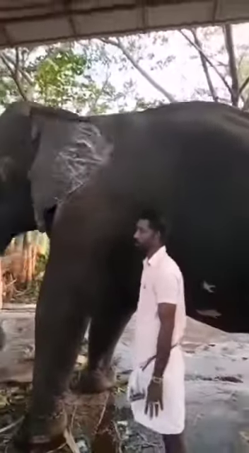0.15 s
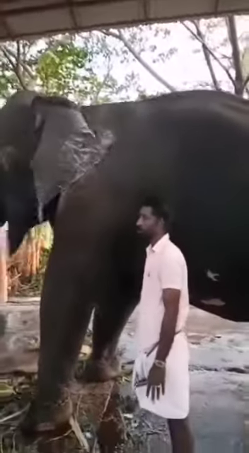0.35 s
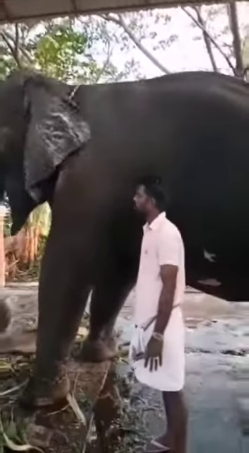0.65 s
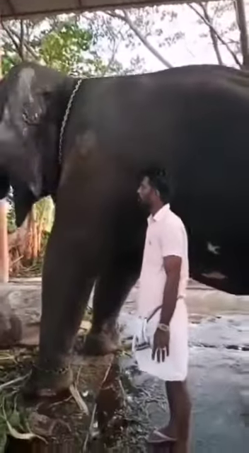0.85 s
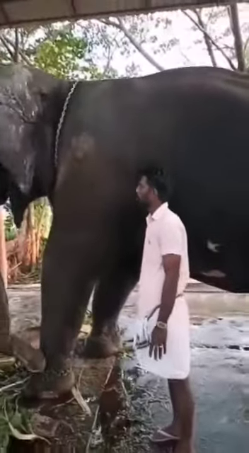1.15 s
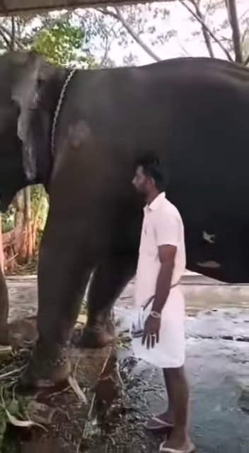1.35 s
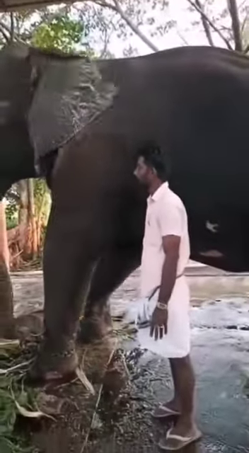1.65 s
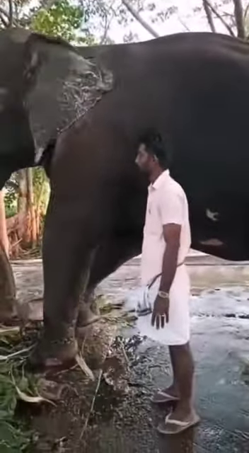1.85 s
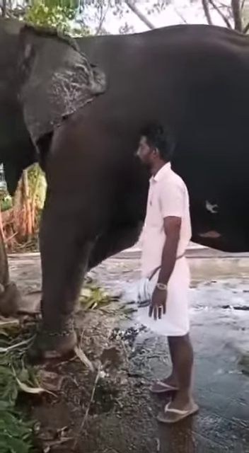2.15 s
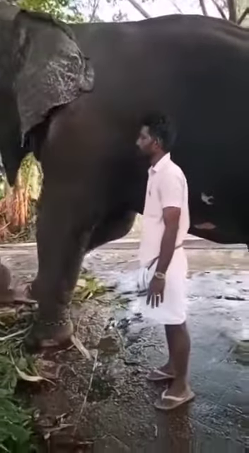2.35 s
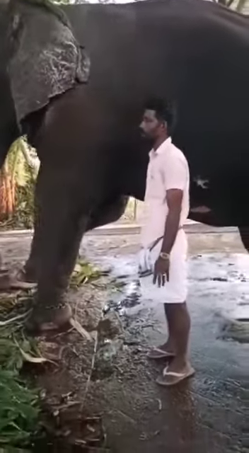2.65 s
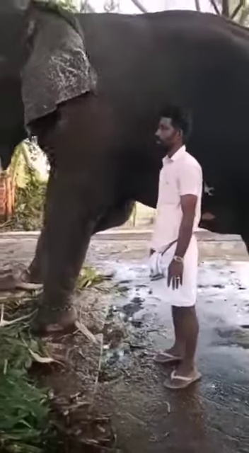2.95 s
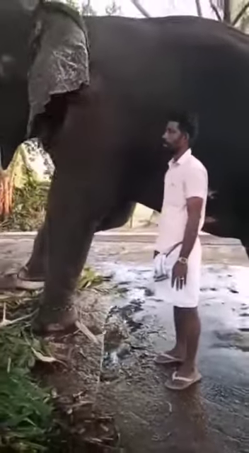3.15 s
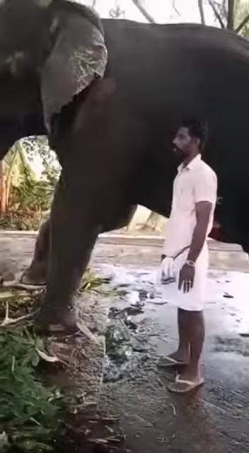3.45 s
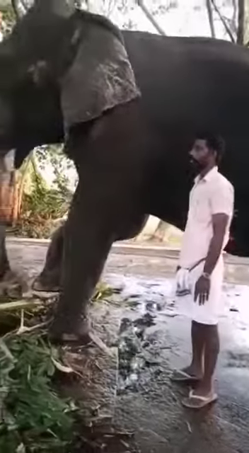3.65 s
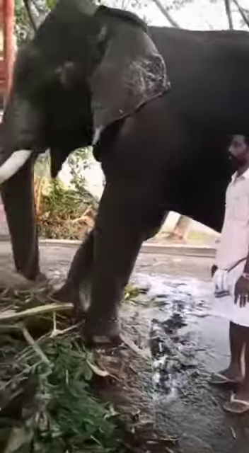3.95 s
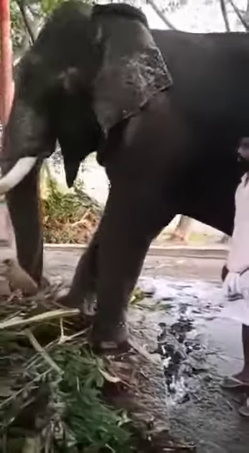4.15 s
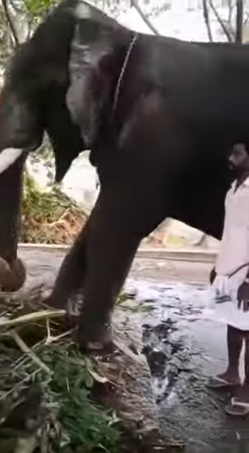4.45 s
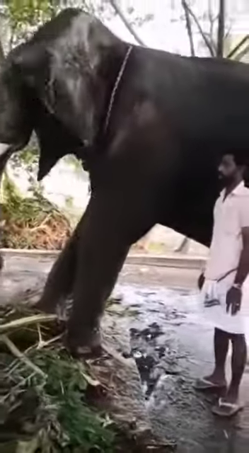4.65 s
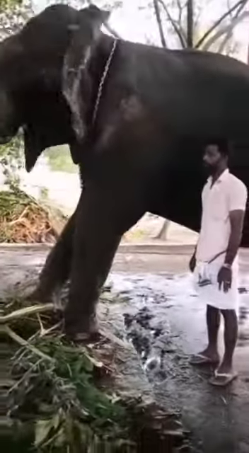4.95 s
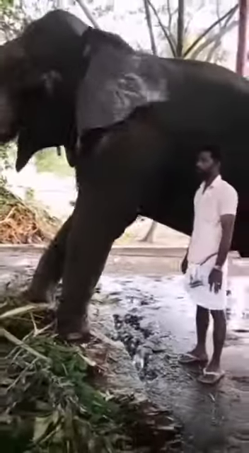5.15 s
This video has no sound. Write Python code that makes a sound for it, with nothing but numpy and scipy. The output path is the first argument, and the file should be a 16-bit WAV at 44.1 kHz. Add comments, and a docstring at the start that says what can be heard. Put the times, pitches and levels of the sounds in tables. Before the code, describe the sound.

Close, crisp leaf crackle over a very quiet outdoor hush: scattered dry snaps and soft low ear flaps, a slowly growing rustle, then a sudden crunching burst as a heavy foot presses the fronds. A quieter passage with tiny squeaks follows. Finally a stalk rips in a ragged run of woody cracks, and the leafy heap is heaved in several noisy pulls, with a short tail from roof and wet floor.

```python
"""Leaflets crackle and snap, a stalk squeaks and splits, big ears slap: an elephant feeds on palm fronds.
It steps in the heap, drags it and tears a thick stalk under an open shelter.
Fronds are shaped noise, fracture clicks and ringing ribs, driven by gains of its movements.
Snaps and splits are decaying resonant bursts, squeaks gliding sines, soft contacts and thuds low swings.
Roof and wet floor add a short diffuse tail, over a faint outdoor hush of shaped noise."""
import sys
import numpy as np
from scipy import signal
from scipy.fft import rfft, irfft, next_fast_len
from scipy.io import wavfile
from scipy.ndimage import map_coordinates

SR = 44100
rng = np.random.default_rng(int(sys.argv[2]) if len(sys.argv) > 2 else 0)


def materialize(psi):
    """Save the field psi as 16-bit PCM at rate SR to the path in sys.argv[1].

    A 1-D psi becomes a single channel; in a 2-D psi each row is a channel.
    """
    bounded = np.clip(np.atleast_2d(psi).T, -1, 1)
    quanta = np.round(bounded * 32767).astype(np.int16)
    wavfile.write(sys.argv[1], SR, quanta)


N = 234279


def amp(db):
    """Decibels to gain."""
    return 10 ** (np.asarray(db) / 20)


def unit(x):
    """x at rms 1."""
    return x / np.sqrt(np.mean(x ** 2) + 1e-20)


def along(points, hz):
    """(Hz, value) points interpolated on a log frequency axis."""
    f, v = np.transpose(points)
    return np.interp(np.log(hz + 1), np.log(f + 1), v)


def wobble(knots_per_s, size=N):
    """Smooth random curve through normally distributed knots."""
    knots = rng.standard_normal(int(size * knots_per_s / SR) + 4)
    return map_coordinates(knots, [np.arange(size) * knots_per_s / SR])


def filtered(x, response):
    """x times a response of frequency in Hz."""
    size = x.shape[-1]
    m = next_fast_len(size + SR // 10)
    return irfft(rfft(x, m) * response(np.fft.rfftfreq(m, 1 / SR)), m)[..., :size]


def resonance(f, hz, width_hz):
    """Causal response of one damped mode, gain 1 at its pitch."""
    return 1j * f * width_hz / (hz * hz - f * f + 1j * f * width_hz)


def spread(pair, side_db):
    """Two unrelated signals as the middle and the side of a stereo image."""
    mid, side = pair[0], amp(side_db) * pair[1]
    return np.array([mid + side, mid - side])


def add(track, start_s, sound):
    """Lay a sound into the track at start_s."""
    start = max(round(start_s * SR), 0)
    part = track[..., start:start + sound.shape[-1]]
    part += sound[..., :part.shape[-1]]


def fronds(hard_db=-32, dull_hz=8500, left_db=1.18):
    """Leaflets brush when stirred and crackle when forced; fibres sound lower; crushed and dragged heaps add body."""
    # spectra: f/Hz, relative level/dB per Hz
    leaflet_spectrum = [(800, -33), (1800, -17.5), (2600, -0.5), (3600, 2), (4400, -1), (5500, 5),
                        (7000, 0), (9500, -11.5), (11000, -11.5), (12200, -2), (14000, -20)]
    fibre_spectrum = [(600, -26.5), (1050, -37), (1300, -2.5), (1600, -3), (1900, 4.5), (2300, 1),
                      (3000, -11.5), (6000, -49)]
    crush_spectrum = [(60, -19), (520, -20), (770, 5.5), (1000, -19), (1220, 4.5), (1600, -3), (3400, -4.5),
                      (4500, -37), (10000, -31), (12300, -5.5), (14000, -25)]
    heap_spectrum = [(60, -21), (190, -38), (350, -3), (560, -6), (780, 3.5), (1100, 1.5), (1700, -5.5),
                     (2600, -2), (3700, 1), (5400, -2.5), (7000, -13.5)]
    leaf, fibre, tread, drag = movements()
    forced = leaf ** 2 / (leaf ** 2 + amp(hard_db) ** 2)  # share of the leaflets that break

    brush = crackle(leaflet_spectrum, rate_per_s=330, size_db=2.5, clump_db=2.0,
                    rub=1.0, ping=0.55, side_db=0.8)
    brush = filtered(brush, lambda f: 0.58 + 0.33 / (1 + (f / dull_hz) ** 10))
    brush = np.sqrt(1 - forced) * amp(-2.5) * brush
    breaking = np.sqrt(forced) * amp(-3.1) * crackle(
        leaflet_spectrum, rate_per_s=380, size_db=2.5, clump_db=2.2, rub=0.6, ping=1.0, side_db=0.5)
    fibres = fibre * amp(-4.0) * crackle(
        fibre_spectrum, rate_per_s=900, size_db=0.5, clump_db=1.5, rub=0.65, ping=0.38, side_db=-1.0)
    crush = tread * amp(-1.0) * crackle(
        crush_spectrum, rate_per_s=350, size_db=2.5, clump_db=3.0, rub=0.95, ping=1.2, side_db=-4.5)
    heap = drag * crackle(
        heap_spectrum, rate_per_s=420, size_db=2.0, clump_db=2.0, rub=0.45, ping=0.8, side_db=-3)

    pan = amp(np.array([[1], [-1]]) * left_db)
    return (leaf * (brush + breaking) + fibres + crush) * pan + heap


def movements(rest_leaf_db=-59.5, rest_fibre_db=-53.5, stir_fall_db_per_s=83.5, heave_fall_db_per_s=119,
              step_rise_s=0.018, step_fall_db_per_s=246, leaflets_db=-14.5, leaflet_growth=0.55,
              shake_s=0.025, heave_fibre_db=-1.5):
    """Drive gains of leaflets, fibres, crushed fronds and heap; one effort drives all that is dragged."""
    # fronds stirred: start t/s, rise/s, hold/s, leaflet drive/dB, fibre drive/dB
    stirs = [(0, 0.00037, 0.2, -41, -53), (0.34, 0.055, 0.062, -33, -41), (0.774, 0.49, 0.024, -40, -60),
             (2.188, 0.42, 0.015, -42.5, -49), (2.746, 0.0024, 0.054, -39, -50),
             (2.808, 0.0049, 0.021, -25.5, -32.5), (2.964, 0.01, 0.17, -27.5, -35.5),
             (3.11, 0.046, 0.053, -35, -42.5), (3.422, 0.034, 0.054, -39.5, -44.5),
             (3.64, 0.044, 0.13, -48, -48), (3.95, 0.17, 0.24, -37.5, -37), (4.307, 0.11, 0.16, -28, -24.5)]
    # trunk heaving at the heap: start t/s, rise/s, hold/s, effort/dB, heap weight re effort/dB
    heaves = [(4.302, 0.25, 0.099, -25, -2), (4.669, 0.025, 0.085, -25.5, -3.5),
              (4.882, 0.053, 0.047, -27, 0.5), (5.01, 0.016, 0.054, -23.5, -3.5)]
    # foot crushing green fronds: start t/s, hold/s, drive/dB
    steps = [(2.796, 0.23, -41.5), (2.985, 0.017, -24), (3.07, 0.098, -35.5), (3.45, 0.013, -40.5)]
    # the heap never lies quite still
    leaf, fibre, drag = [np.full(N, amp(rest_leaf_db))], [np.full(N, amp(rest_fibre_db))], []
    for start_s, rise_s, hold_s, leaf_db, fibre_db in stirs:
        stir = stroke(start_s, rise_s, hold_s, stir_fall_db_per_s)
        leaf.append(amp(leaf_db) * stir)
        fibre.append(amp(fibre_db) * stir)
    for start_s, rise_s, hold_s, effort_db, weight_db in heaves:
        pull = amp(effort_db) * stroke(start_s, rise_s, hold_s, heave_fall_db_per_s)
        # even a light pull shakes the leaflets, which shake on after it
        leaf_db = leaflets_db + leaflet_growth * effort_db
        leaf.append(amp(leaf_db) * stroke(start_s, rise_s, hold_s + shake_s, stir_fall_db_per_s))
        fibre.append(amp(heave_fibre_db) * pull)
        drag.append(amp(weight_db) * pull)
    tread = [amp(db) * stroke(start_s, step_rise_s, hold_s, step_fall_db_per_s)
             for start_s, hold_s, db in steps]
    return [together(gains) for gains in (leaf, fibre, tread, drag)]


def stroke(start_s, rise_s, hold_s, fall_db_per_s):
    """Gain of one movement: it builds up, holds and dies away."""
    t = np.arange(N) / SR - start_s
    return np.clip(t / rise_s, 0, 1) * amp(-fall_db_per_s * np.maximum(t - rise_s - hold_s, 0))


def together(gains):
    """Unrelated rustles add in power."""
    return np.sqrt(np.sum(np.square(gains), axis=0))


def crackle(spectrum, rate_per_s, size_db, clump_db, rub, ping, side_db):
    """Tiny fractures of uneven size in clumps and pinging ribs, over the rubbing of leaf on leaf."""
    happens = rng.random(N) < rate_per_s / SR
    size = amp(size_db * np.minimum(rng.exponential(size=N), 3))
    clicks = happens * size * np.array([rng.choice([-1, 1], N), rng.standard_normal(N)])
    clumps = amp(clump_db * wobble(110))
    rubbing = rub * rng.standard_normal((2, N))
    pair = (unit(clicks) + rubbing) * clumps + ping * pings()
    pair = shifting(pair, depth_db=5.0, span_hz=85, life_s=0.024)
    return spread(unit(filtered(pair, lambda f: amp(along(spectrum, f)))), side_db)


def pings(rate_per_s=480, low_hz=800, high_hz=13000, ring_cycles=7, size_range_db=8):
    """Small ribs give way one by one, each ringing briefly at a pitch of its own."""
    draws = rng.random((round(rate_per_s * N / SR), 5))
    when, place, size, phase_mid, phase_side = draws.T[..., None]
    hz = low_hz * (high_hz / low_hz) ** place
    k = np.arange(SR // 100)
    cycles = hz * k / SR
    fade = hz * amp(size_range_db * size) * np.exp(-cycles / ring_cycles)  # level rises with pitch
    at = ((when * N).astype(int) + k).ravel()
    pair = []
    for phase in (phase_mid, phase_side):
        rings = fade * np.sin(2 * np.pi * (cycles + phase))
        pair.append(np.bincount(at, rings.ravel(), N)[:N])
    return unit(np.array(pair))


def shifting(pair, depth_db, span_hz, life_s):
    """Changing resonances: random patches of gain in pitch and time, shared by both signals."""
    z = signal.stft(pair, nperseg=1024)[2]
    steps = np.arange(-12, 13)
    across = np.exp(-0.5 * (steps * SR / 1024 / span_hz) ** 2)
    during = np.exp(-0.5 * (steps * 512 / SR / life_s) ** 2)
    field = signal.fftconvolve(rng.standard_normal(z.shape[1:]), np.outer(across, during), "same")
    gain = amp(depth_db * np.minimum(unit(field), 1.8))
    return signal.istft(z * gain, nperseg=1024)[1][:, :N]


def snaps(rise_s=0.0024, settle_db=-17, settle_t60_s=0.22, width=0.19, side_db=-1.5):
    """A dry rib breaks in a sharp, ragged run of tiny fractures, and the leaflets on it shiver on."""
    # t/s, level before a common -9.5 dB trim/dB, f/Hz, t60 of the break/s
    rib_breaks = [(0.083, -11.5, 5120, 0.032), (.173, -14.5, 5300, 0.034), (.354, -15.5, 5560, 0.053),
                  (.5515, -17.5, 2450, 0.024), (1.091, -20.5, 4940, 0.0083), (1.597, -37, 7620, 0.029),
                  (1.8887, -11.5, 6200, 0.012), (1.906, -33, 6060, .1), (1.928, -30, 6250, 0.16),
                  (2.3105, -29, 2050, 0.037), (2.485, -20, 6700, 0.03), (2.745, -18.5, 6540, 0.06),
                  (2.815, -12.5, 3350, 0.035), (2.833, -21, 3530, 0.023), (2.923, -9, 5440, 0.019),
                  (2.935, -11, 5000, 0.021), (2.985, -14, 5940, 0.1), (3.009, -14.5, 1326, 0.041),
                  (3.031, -5, 5700, 0.019), (3.168, -21, 5630, 0.022), (3.187, -6, 2680, 0.013),
                  (3.222, -17.5, 5400, 0.064), (3.988, -23, 6800, 0.023), (4.0926, -11.5, 5600, 0.019),
                  (4.528, -9.5, 3550, 0.036), (4.592, -13.5, 4400, 0.39), (4.705, -10, 2280, 0.046),
                  (4.913, -18, 2480, 0.035), (5.025, -21, 3480, 0.06), (5.037, -7.5, 1720, 0.03),
                  (5.094, -10.5, 5330, 0.066)]
    out, t = np.zeros((2, N)), np.arange(SR // 2) / SR
    for start_s, db, hz, t60_s in rib_breaks:
        shiver = amp(settle_db - 60 * t / settle_t60_s)
        fade = (amp(-60 * t / t60_s) + shiver) * (1 - np.exp(-t / rise_s))
        fractures = rng.standard_normal((2, len(t))) * amp(4 * np.tanh(wobble(700, len(t))))
        tone = lambda f: resonance(f, hz, width * hz) * resonance(f, 2000, 4700)
        add(out, start_s, amp(db - 9.5) * spread(unit(filtered(fractures, tone)) * fade, side_db))
    return out


def splits(swell_s=0.0014, tear_db=-6.0, tear_t60_s=0.069, crack_db=-15, crack_t60_s=0.026, apart_rad=0.093):
    """Each bursting fibre cracks and knocks the hollow stalk, which rings a few cycles and tears on raggedly."""
    # t/s, level of the ring/dB, f/Hz
    fibre_bursts = [(3.952, -24, 1800), (4.170, -17, 1590), (4.241, -22.5, 2020), (4.292, -17.5, 1830),
                    (4.332, -16, 2170), (4.336, -22, 1950), (4.343, -17, 1830), (4.350, -12.5, 1940),
                    (4.3737, -14, 1870), (4.401, -12.5, 1770), (4.423, -10, 1930), (4.432, -8, 1815),
                    (4.4376, -16, 1860), (4.451, -19, 1880), (4.484, -12.5, 1810), (4.589, -10.5, 2140),
                    (4.598, -10, 1850), (4.609, -17, 2010), (4.643, -12.5, 1880)]
    out, t = np.zeros((2, N)), np.arange(SR // 10) / SR
    knock = t / swell_s * np.exp(1 - t / swell_s)
    sides = np.array([[1], [-1]])
    for start_s, db, hz in fibre_bursts:
        # the ring is out of step between the channels
        ring = knock * np.sin(2 * np.pi * (hz * t + rng.random()) + apart_rad * sides)
        noise = rng.standard_normal((2, len(t)))
        tear = unit(filtered(noise, lambda f: resonance(f, hz, 0.5 * hz) ** 2))
        tear *= amp(tear_db - 60 * t / tear_t60_s) * (1 - np.exp(-t / (2 * swell_s)))
        noise = rng.standard_normal((2, len(t)))
        crack = unit(filtered(noise, lambda f: resonance(f, 3300, 4800) ** 2))
        crack *= amp(crack_db - 60 * t / crack_t60_s)
        add(out, start_s, amp(db) * (ring + tear + crack))
    return out


def squeaks(glide_per_s=0.12, rise_s=0.0039, waver=0.0048, flutter_db=1.0, left_db=5.3):
    """Smooth stalk skin sticks and slips in short, nearly pure squeals that glide up by a share of the pitch."""
    # t/s, level before panning/dB, starting f/Hz, hold/s, t60/s
    squeals = [(3.147, -20, 5450, 0.0017, 0.012), (3.662, -43, 1860, 0.012, .1),
               (3.796, -46, 1712, .04, 0.09), (4.285, -18, 5650, 0.03, 0.16)]
    out, t = np.zeros(N), np.arange(SR // 6) / SR
    for start_s, db, hz, hold_s, t60_s in squeals:
        pitch_hz = hz * (1 + glide_per_s * t + waver * wobble(237, len(t)))
        level_db = db - 60 * np.maximum(t - hold_s, 0) / t60_s + flutter_db * wobble(177, len(t))
        squeal = np.sin(2 * np.pi * np.cumsum(pitch_hz) / SR)
        add(out, start_s, amp(level_db) * (1 - np.exp(-t / rise_s)) * squeal)
    return out * amp(np.array([[1], [-1]]) * left_db)


def body(lead_s=0.022, flutter_db=-21):
    """Low soft contacts: ear slaps, the hollow knock of a step, the low body of the dragged heap; weight thuds."""
    # t/s, peak level/dB, f/Hz, t60/s
    soft_contacts = [(0.364, -24.5, 199, 0.088), (1.822, -24, 264, 0.023), (1.837, -34.5, 327, 0.047),
                     (3.005, -26, 810, 0.061), (4.52, -29, 338.5, 0.64), (5.044, -26.5, 246.7, 0.099),
                     (5.089, -30, 287.4, 0.49)]
    # dull thuds of shifting weight: t/s, peak level/dB
    weight_thuds = [(1.887, -43.5), (2.313, -47.5), (2.613, -48), (3.751, -47), (4.638, -43), (5.041, -44)]
    out = np.zeros(N)
    for start_s, db, hz, t60_s in soft_contacts:
        add(out, start_s - lead_s, amp(db + flutter_db) * lead_in(hz, lead_s))
        # the longer the decay, the noisier the swing
        add(out, start_s, amp(db) * thump(hz, t60_s, rise_s=0.0074, noise=3.6 * t60_s))
    for start_s, db in weight_thuds:
        add(out, start_s, amp(db) * thump(hz=78.3, t60_s=0.13, rise_s=0.0066, noise=3.9))
    return out


def thump(hz, t60_s, rise_s, noise):
    """A soft contact: a low swing that swells and dies, with noise around its pitch, at peak 1."""
    t = np.arange(SR // 2) / SR
    loose = unit(filtered(rng.standard_normal(len(t)), lambda f: resonance(f, hz, 0.48 * hz) ** 2))
    fade = amp(-60 * t / t60_s) * (1 - np.exp(-t / rise_s)) ** 2
    swing = (np.sin(2 * np.pi * hz * t) + noise * loose) * fade
    return swing / np.abs(swing).max()


def lead_in(hz, lead_s):
    """Low fluttering noise swells ahead of a contact and dies away after it."""
    t = np.arange(SR // 5) / SR
    flutter = unit(filtered(rng.standard_normal(len(t)), lambda f: resonance(f, hz, 0.4 * hz) ** 2))
    return flutter * t / lead_s * np.exp(1 - t / lead_s)


def shelter(x, delay_s=0.006):
    """Roof and floor send back a short diffuse tail: noise decaying at a rate set by frequency."""
    # f/Hz, t60/s
    tail_t60 = [(150, 0.13), (4000, 0.088), (13000, 0.13)]
    hz, t, z = signal.stft(rng.standard_normal((2, SR // 2)), SR, nperseg=256)
    fade = amp(-60 * t / along(tail_t60, hz)[:, None])
    tail = signal.istft(z * fade, SR, nperseg=256)[1]
    late = np.pad(x, ((0, 0), (round(delay_s * SR), 0)))
    return signal.fftconvolve(late, tail / np.linalg.norm(tail[0]), axes=1)[:, :N]


def hush(level_db=-57):
    """Distant trees and air: shaped noise, gently wavering."""
    # f/Hz, relative level/dB per Hz
    air_spectrum = [(25, -25), (65, 2), (130, -1), (300, -2.5), (600, -5.5), (1150, -6.5), (1900, -14),
                    (4000, -69), (6700, -1.5), (14000, -36)]
    gusts = shifting(rng.standard_normal((2, N)), depth_db=2.0, span_hz=121, life_s=0.025)
    air = unit(filtered(gusts, lambda f: amp(along(air_spectrum, f))))
    return amp(level_db + 0.35 * wobble(4.97)) * spread(air, side_db=-8.0)


def scene():
    """The feeding animal under its roof."""
    leaves = fronds() + snaps()
    stalk = splits() + squeaks()
    contacts = body()
    echo = shelter(amp(-6.0) * leaves + amp(-7.0) * stalk + amp(-13.0) * contacts)
    return leaves + stalk + contacts + echo + hush()


def record(dry, notch_hz=4420, notch_width_hz=520, ceiling=0.72, top_hz=13450):
    """A narrow dip in the treble; high peaks are rounded off and the band ends steeply."""
    coloured = filtered(dry, lambda f: 1 - 0.68 * resonance(f, notch_hz, notch_width_hz))
    rounded = coloured / (1 + (coloured / ceiling) ** 4) ** 0.25
    return filtered(rounded, lambda f: 1 / np.sqrt(1 + (f / top_hz) ** 120))


dry = scene()
out = record(dry)
materialize(out)
```